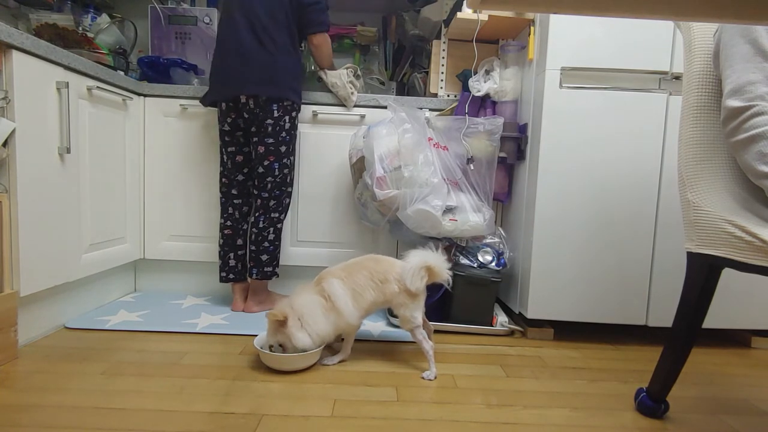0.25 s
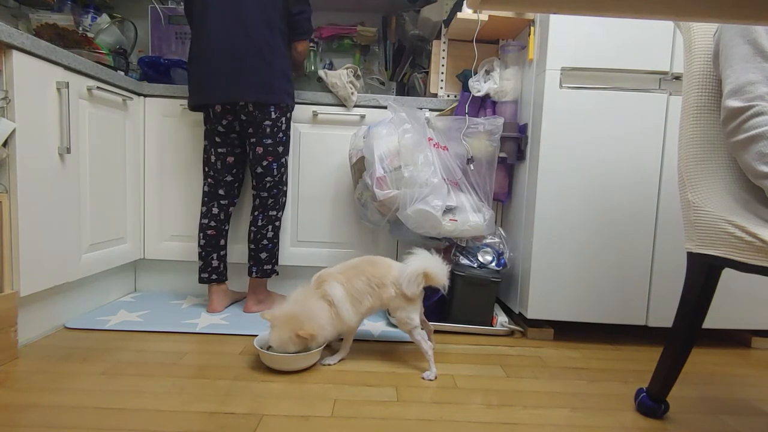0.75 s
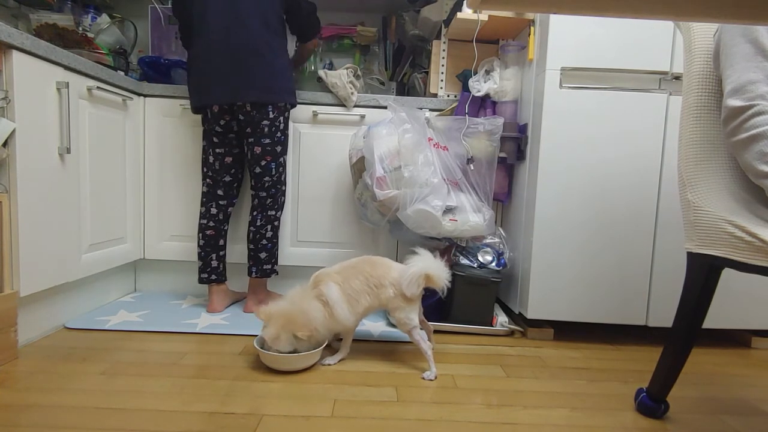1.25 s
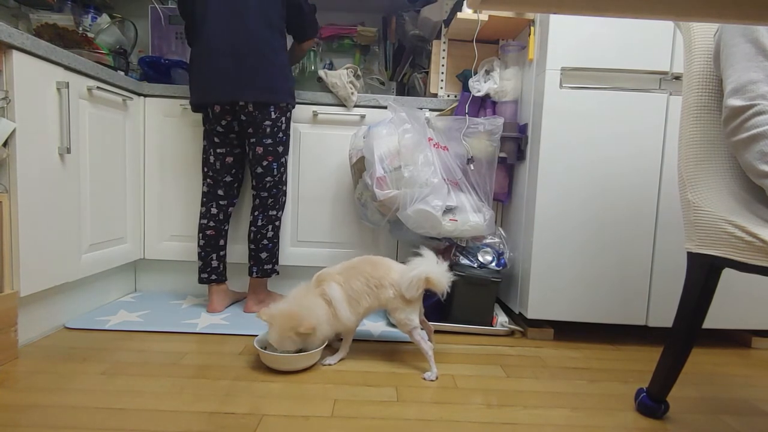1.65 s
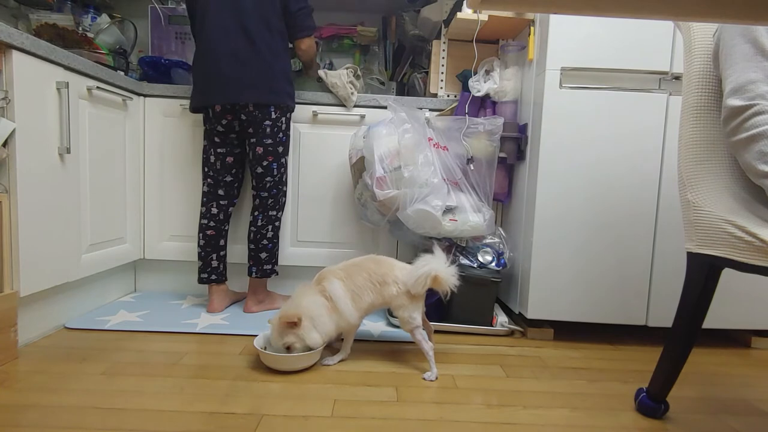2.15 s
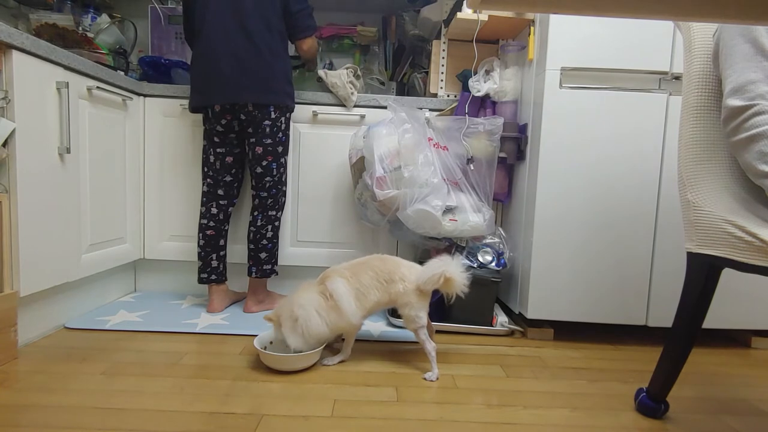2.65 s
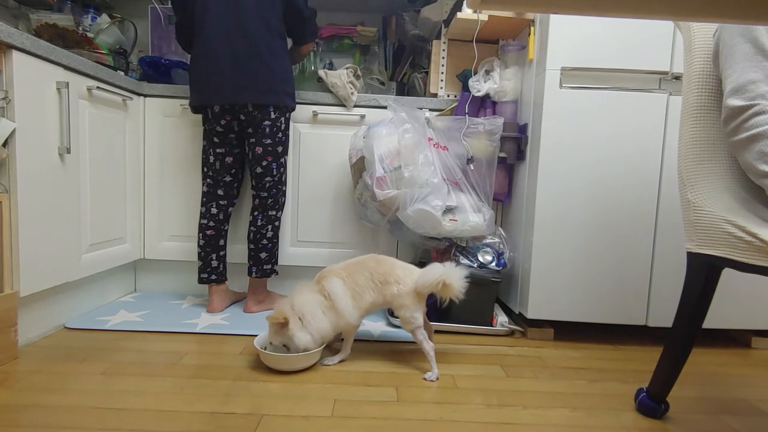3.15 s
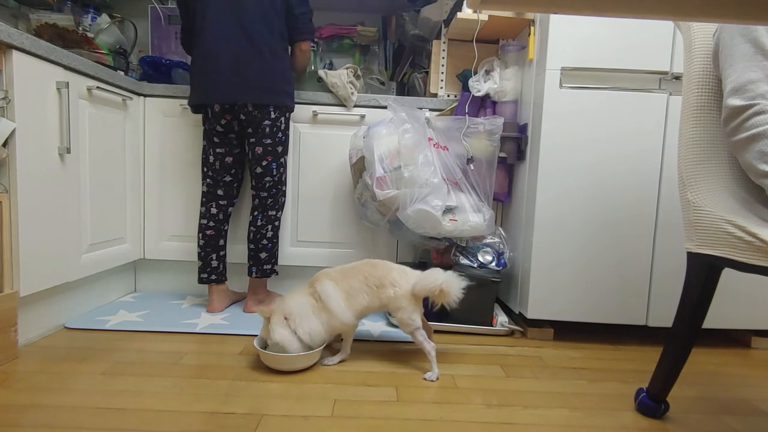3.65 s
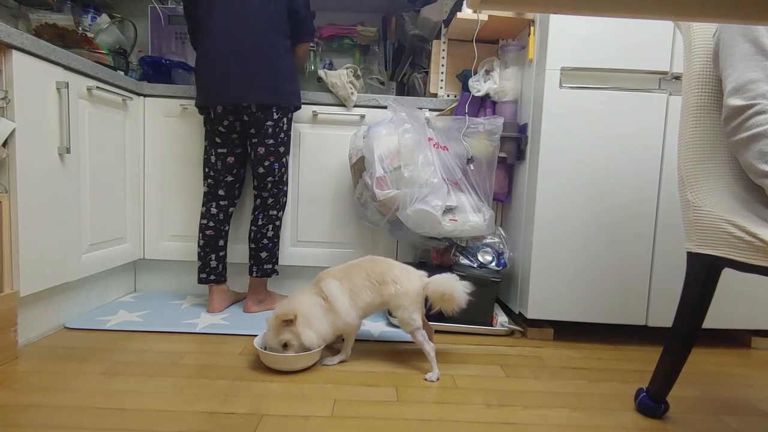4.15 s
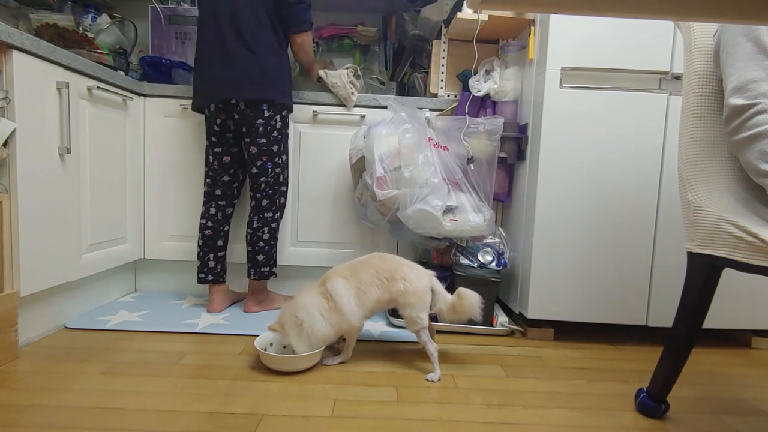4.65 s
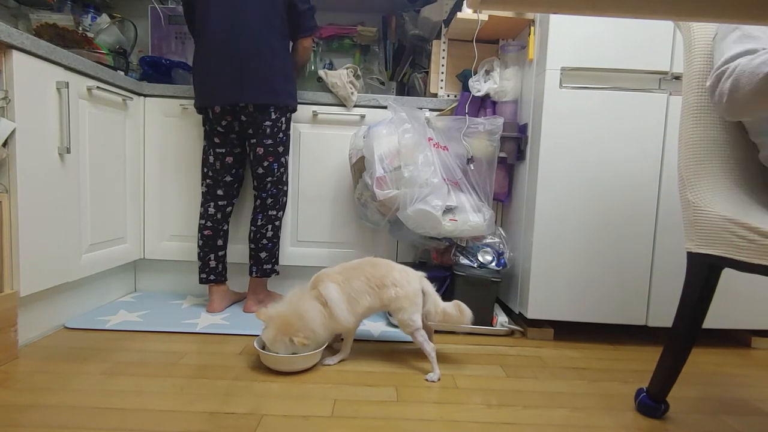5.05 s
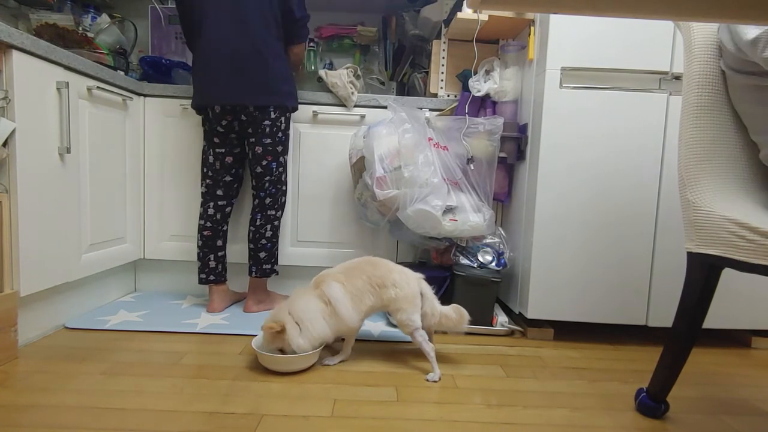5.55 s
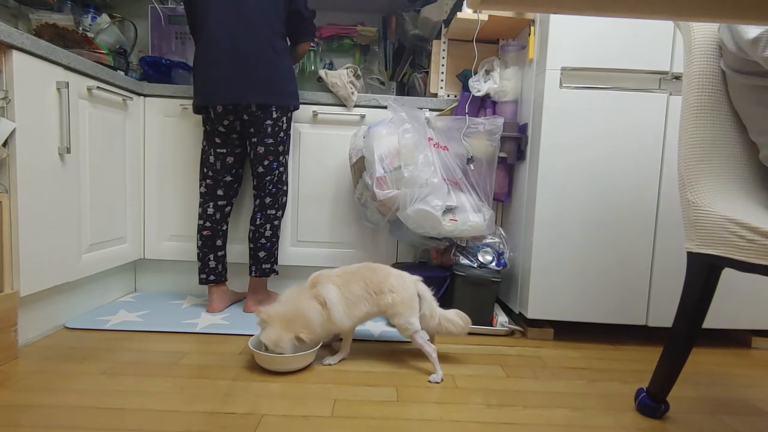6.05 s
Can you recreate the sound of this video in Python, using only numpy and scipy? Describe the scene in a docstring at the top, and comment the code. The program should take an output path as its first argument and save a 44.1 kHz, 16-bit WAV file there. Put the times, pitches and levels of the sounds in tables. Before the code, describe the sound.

A small dog eats dry kibble from a bowl a few steps away in a kitchen. Its muzzle stirs the pieces into a busy patter of little clinks and squeaks, mixed with gritty chewing. Sharper cracks stand out now and then, and the bowl is briefly knocked and nudged along the hard floor. After one short early pause the eating carries on, over a faint hiss and fridge hum.

```python
"""Squeaks, clinks and crunches: a small dog noses and chews dry kibble in a bowl a few steps away.
Pieces slip on the glaze and ring the bowl; teeth rasp and crack them; the bowl is shoved
across the hard kitchen floorboards. Behind it, a thin hiss rings in the same bands as the bowl
and a fridge hums faintly. Heard through a phone's two microphone ports and noise suppressor."""
import sys
import numpy as np
from scipy import signal
from scipy.fft import rfft, irfft
from scipy.io import wavfile
from scipy.ndimage import uniform_filter1d

SR = 44100
rng = np.random.default_rng(int(sys.argv[2]) if len(sys.argv) > 2 else 0)


def waveform_to_disk(signal):
    """Save audio, clipped to [-1, 1], as 16-bit WAV at the path in sys.argv[1]."""
    frames = np.transpose(np.atleast_2d(signal))
    scaled = np.clip(frames, -1, 1) * 32767
    samples = np.round(scaled).astype(np.int16)
    wavfile.write(sys.argv[1], SR, samples)


N = 278138
BAND_LIMIT_HZ = 16500
# bowl resonances: freq_hz, width_hz, level_db
BOWL_MODES = [(2144, 64, 2), (2860, 28, -8.5), (3044, 250, 6), (3920, 180, -9.5), (3853, 13, 4),
              (4836, 80, -8), (5030, 200, -18), (5500, 32, -41), (5596, 680, 12.5), (6000, 280, -54)]


def amp(db):
    return 10 ** (np.asarray(db) / 20)


def unit_rms(x):
    return x / np.sqrt(np.mean(x ** 2) + 1e-20)


def curve_at(points, hz):
    """Interpolate (freq_hz, value) points over log frequency."""
    f, value = np.transpose(points)
    return np.interp(np.log(hz + 1), np.log(f + 1), value)


def add(mix, start_s, sound):
    part = mix[max(round(start_s * SR), 0):][:len(sound)]
    part += sound[:len(part)]


def resonances(modes, hz):
    """Magnitude of (freq_hz, width_hz, level_db) peaks, summed in power."""
    return np.sqrt(sum(amp(db) ** 2 / (1 + (2 * (hz - f) / width) ** 2) for f, width, db in modes))


def filtered(x, gain_at_hz):
    return irfft(rfft(x) * gain_at_hz(np.fft.rfftfreq(len(x), 1 / SR)), len(x))


def crunch_noise(lo_hz, hi_hz, grit_db):
    """A dense hail of tiny, uneven fractures in one band, at unit rms."""
    # fracture spectrum: freq_hz, density_db
    spectrum = [(59, -52), (100, -66), (466, -21.5), (1910, -13.5), (2310, 1.5), (3320, 0), (3620, -4.5),
                (4780, 0), (7330, -3.5), (9270, -2), (10300, -7.5), (14800, -3), (16500, -49)]
    noise = rng.standard_normal(N)
    grain = amp(grit_db * uniform_filter1d(rng.standard_normal(N), size=30) * np.sqrt(30))
    passband = lambda hz: 1 / np.sqrt((1 + (lo_hz / (hz + 1)) ** 8) * (1 + (hz / hi_hz) ** 8))
    return unit_rms(filtered(noise * grain, lambda hz: amp(curve_at(spectrum, hz)) * passband(hz)))


def ring(width_ms, hz, peak_db, glide_hz_per_ms, phase_turns):
    """A note that swells, slides and fades within 60 ms, peaking 20 ms in."""
    t = np.arange(-.02, .04, 1 / SR)
    half_width_s = np.where(t < 0, .8, 1.1) * (width_ms + 1.8) / 1000 / 2
    envelope = amp(peak_db) / np.cosh(0.84 * t / half_width_s) ** 2
    return envelope * np.sin(2 * np.pi * (hz * t + 500 * glide_hz_per_ms * t ** 2 + phase_turns))


def fridge():
    """Steady hum lines whose phases wander."""
    # hum lines: freq_hz, rms_db
    lines = [(479.1, -78.5), (1082, -89), (1620, -81.5), (1744, -85.5), (1954, -100), (2213, -85),
             (2277, -75), (2616, -69.5)]
    t = np.arange(N) / SR
    wander_rad = np.cumsum(rng.standard_normal((len(lines), N)), axis=1) * 0.0081
    return sum(np.sqrt(2) * amp(db) * np.sin(2 * np.pi * hz * t + phase)
               for (hz, db), phase in zip(lines, wander_rad))


def hiss():
    """Broad noise with narrow rings on top; body and treble levels drift separately."""
    # broad spectrum: freq_hz, density_db
    floor = [(30, -13.5), (60, -17.5), (110, -25.5), (170, -48), (260, -25), (400, -20.5), (470, -16.5),
             (1800, -10), (2600, -6), (3750, -6.5), (4240, -8), (4800, -3), (6600, -13.5), (14200, -17.5),
             (16500, -22.5)]
    # narrow peaks: freq_hz, width_hz, relative_db
    rings = [(2390, 19, -41), (2950, 2.7, -7), (2934, 88, -2), (3414, 15, -21.5), (3694, 27, 4),
             (4850, 24, 2), (5230, 120, -37), (5960, 230, -20), (7300, 77, -9), (9650, 300, -8),
             (10400, 67, -17), (10860, 28, -3.5)]
    # level drift: time_s, body_db, treble_db
    drift = [(0.0, -51, -66), (0.65, -57, -64.5), (0.93, -58, -67), (1.51, -57.5, -60.5),
             (1.79, -60.5, -63.5), (2.12, -57, -76), (2.3, -59.5, -72), (2.6, -56, -62.5),
             (2.82, -58.5, -72), (3.28, -58.5, -60.5), (3.83, -58, -63.5), (4.49, -58.5, -64.5),
             (4.86, -56.5, -65.5), (5.12, -61, -72), (5.33, -54, -63), (5.7, -59.5, -64.5),
             (6.11, -56.5, -68), (6.3, -56.5, -62)]
    spectrum = lambda hz: amp(curve_at(floor, hz)) * np.hypot(1, amp(12) * resonances(rings, hz))
    noise = filtered(rng.standard_normal(N), spectrum)
    treble = filtered(noise, lambda hz: hz > 6700)
    time_s, body_db, treble_db = np.transpose(drift)
    t = np.arange(N) / SR
    return (unit_rms(noise - treble) * amp(np.interp(t, time_s, body_db))
            + unit_rms(treble) * amp(np.interp(t, time_s, treble_db)))


def board_shake(eating):
    """The boards rumble faintly under loud blows."""
    running_rms = np.sqrt(abs(uniform_filter1d(eating ** 2, size=600)))
    return amp(-45.5) * running_rms * crunch_noise(44, 136, grit_db=5)


def bowl_shove_gain():
    """Envelope of the bowl scraping along the boards, zero between shoves."""
    # one curve per shove: time_s, level_db
    shoves = [
        [(1.685, -24), (1.75, -26), (1.795, -33.5), (1.812, -57)],
        [(3.62, -45), (3.644, -42), (3.68, -64)],
        [(3.84, -50), (3.962, -36), (4.08, -57)],
    ]
    gain = np.zeros(N)
    for shove in shoves:
        time_s, level_db = np.transpose(shove)
        t = np.arange(time_s[0], time_s[-1], 1 / SR)
        add(gain, time_s[0], amp(np.interp(t, time_s, level_db)))
    return gain


def tooth_rasps():
    """Kibble rubs on teeth: grainy treble puffs, each with four thin rings."""
    # rasps: start_s, peak_db, centre_hz
    rasps = [(0.223, -46, 7340), (0.3042, -42, 8600), (0.32, -53, 7140), (0.3674, -43.5, 9400),
             (0.613, -45, 13800), (0.7013, -40.5, 7100), (0.7625, -50, 10200), (0.802, -41, 11800),
             (0.854, -43, 7600), (1.59, -61, 14300), (1.6382, -49, 10200), (1.962, -42, 7850),
             (2.0009, -38.5, 8000), (2.1043, -46.5, 7100), (2.145, -46, 9600), (2.2118, -47, 10100),
             (2.2755, -42.5, 14100), (2.335, -50, 14600), (2.623, -47, 13900), (2.657, -45, 10600),
             (2.6873, -42, 9400), (2.7175, -46, 11600), (2.7294, -44, 7200), (2.8504, -41, 8650),
             (2.8883, -48, 14900), (2.9527, -43.5, 13700), (3.017, -44.5, 8000), (3.045, -41.5, 13200),
             (3.4096, -55, 10800), (3.443, -45, 6660), (3.4565, -38.5, 6240), (3.5433, -45, 7150),
             (3.5813, -54, 11200), (3.5987, -49, 9200), (3.7524, -42.5, 13700), (3.8212, -43.5, 8340),
             (4.116, -44, 10600), (4.2258, -32, 6540), (4.3924, -40, 9500), (4.418, -41, 7200),
             (4.636, -43.5, 13500), (4.7353, -43, 7900), (4.7926, -46, 14600), (4.812, -39.5, 13800),
             (4.8385, -37, 8600), (4.8803, -38.5, 7000), (4.9247, -47, 14600), (5.0265, -42, 11100),
             (5.114, -43.5, 14000), (5.1417, -40.5, 8200), (5.1816, -53, 10600), (5.1986, -41.5, 9800),
             (5.3745, -38.5, 10000), (5.467, -50, 7200), (5.5194, -46, 10100), (5.887, -43, 14200),
             (5.9714, -44, 7350), (6.0102, -43.5, 14500), (6.0935, -46.5, 8600), (6.133, -47, 12800),
             (6.1725, -43, 7520), (6.2123, -41, 11600)]
    out, t = np.zeros(N), np.arange(1600) / SR
    swell = (t / .005) * np.exp(1 - t / .005)
    for (start_s, peak_db, centre_hz), draws in zip(rasps, rng.random((len(rasps), 4, 3))):
        peaks = [(centre_hz, 900, 0), (centre_hz, 7000, -9)]
        puff = filtered(rng.standard_normal(len(t)), lambda hz: (hz > 5000) * resonances(peaks, hz))
        grain = amp(25 * uniform_filter1d(rng.standard_normal(len(t)), size=50))
        rasp = puff * grain * swell
        add(out, start_s - .001, amp(peak_db) * rasp / abs(rasp).max())
        for lag, length, pitch in draws:
            note = ring(3 + 6 * length, 6500 + 8000 * pitch, peak_db - 19.5, 40 * (length - lag), lag)
            add(out, start_s - .015 + 0.0061 * lag, note)
    return out


def cracks_and_shoves():
    """Each crack is a three-band burst, a hollow knock and a note; shoves feed the upper two bands."""
    # bites and knocks: start_s, body_db, knock_db, knock_hz, treble_db, ring_hz, decay_ms
    cracks = [(0.2314, -62, -36.5, 1410, -66, 2430, 15), (0.242, -61, -39, 1080, -61, 2420, 30),
              (0.5397, -21.5, -52, 473, -19.5, 3076, 49), (0.7426, -24, -77, 1560, -27.5, 3280, 12),
              (0.9394, -54, -82, 476, -49, 3740, 31), (0.9934, -64, -86, 479, -45, 2680, 21),
              (1.6851, -20.5, -35.5, 1890, -29, 2257, 92), (1.7057, -22, -35.5, 1800, -33, 3370, 87),
              (1.7234, -20, -44, 1800, -29, 2254, 87), (1.7404, -21.5, -55, 1860, -40, 2348, 82),
              (1.7543, -24, -46, 461.6, -26.5, 2820, 230), (1.7794, -29.5, -47.5, 438, -28, 2925, 103),
              (1.918, -47, -52.5, 774, -52.5, 2860, 51), (2.47, -47, -89, 468, -40.5, 14800, 44),
              (2.452, -71, -76, 464, -50, 4900, 98), (3.436, -49, -49.5, 463, -66, 3830, 29),
              (3.5533, -36.5, -43.5, 473, -45, 2420, 28), (3.629, -37.5, -54, 1320, -42, 3260, 49),
              (3.6391, -30, -47.5, 462, -27, 9200, 63), (3.8508, -59, -55, 1055, -37.5, 14400, 70),
              (3.887, -67, -56, 1080, -39.5, 4610, 120), (3.906, -57, -50, 446, -33, 5440, 37),
              (3.923, -41, -46, 1160, -32, 12800, 47), (3.9439, -20.5, -24, 1733, -23, 2428, 48),
              (3.9741, -44, -44, 1444, -43, 4860, 75), (4.0208, -48, -47.5, 1370, -41, 4950, 50),
              (4.058, -38, -58, 1700, -44.5, 4820, 47), (4.3536, -53, -54.5, 913, -47.5, 2890, 36),
              (4.5365, -29, -44, 1813, -30, 4830, 57.5), (4.621, -64, -57, 446, -67, 3200, 97),
              (4.704, -33.5, -40, 1387, -36.5, 7990, 83), (5.064, -69, -56.5, 1790, -71, 3000, 56),
              (5.2336, -26.5, -46, 1660, -26.5, 3270, 16), (5.249, -27, -41.5, 1680, -17, 8430, 23.5),
              (5.2566, -25.5, -44, 1644, -23, 9400, 44), (5.3106, -63, -63, 1050, -51.5, 9150, 130),
              (5.3328, -48, -54.5, 1063, -39, 2460, 140), (5.438, -67, -48, 1706, -44, 4820, 91),
              (5.4834, -28.5, -84.5, 1800, -33, 2890, 25), (6.2283, -40.5, -50.5, 1658, -40.5, 5050, 126)]
    thud, body, treble, tones = np.zeros((4, N))
    t = np.arange(0, .15, 1 / SR)
    attack = lambda rise_s: 1 - np.exp(-t / rise_s)
    for start_s, body_db, knock_db, knock_hz, treble_db, ring_hz, decay_ms in cracks:
        fall_db = -60 * t / (decay_ms / 1000) - 60 * (t / 0.085) ** 3
        knock = amp(knock_db + 0.59 * fall_db) * attack(0.00066)
        add(thud, start_s, amp(-3.5) * knock)
        add(tones, start_s, knock * np.sin(2 * np.pi * knock_hz * t))
        add(body, start_s, amp(body_db + fall_db) * attack(0.0019))
        add(treble, start_s, amp(treble_db + 1.16 * fall_db) * attack(0.0012))
        ring_db = body_db + 4.5 if ring_hz < 6500 else treble_db + 6.5
        ring_gain = amp(ring_db + 1.47 * fall_db) * attack(0.0018)
        add(tones, start_s, ring_gain * np.sin(2 * np.pi * ring_hz * t))
    shove = bowl_shove_gain()
    return (tones + thud * crunch_noise(297, 1630, grit_db=4)
            + (body + amp(-7) * shove) * crunch_noise(2050, 6600, grit_db=2.2)
            + (treble + amp(-6.5) * shove) * crunch_noise(7670, 16000, grit_db=0.5))


def squeak(width_ms, pitch_hz, level_db, glide_hz_per_ms_per_khz, draws, skip_hz=0):
    """A piece slips on the glaze: all multiples of the slip rate slide together."""
    # overtone envelope: freq_hz, level_db
    spectrum = [(1300, -25), (2100, -14), (2900, 1), (3800, -2.5), (4850, -5.5), (5700, -5.5), (7200, -20),
                (9500, -19.5), (13000, -22), (16000, -31)]
    spread_db = 13
    harmonics_hz = pitch_hz * np.arange(1, len(draws) + 1)
    return sum(ring(width_ms, hz, level_db + curve_at(spectrum, hz) - spread_db * cut,
                    glide_hz_per_ms_per_khz * hz / 1000, phase)
               for hz, (cut, phase) in zip(harmonics_hz, draws)
               if hz < BAND_LIMIT_HZ and abs(hz - skip_hz) > 1)


def kibble_chatter(rate_per_s=100, width_ms=5.7, spread_db=14):
    """Jostled pieces: small squeaks at random times, at unit rms."""
    out = np.zeros(N)
    count = round(rate_per_s * N / SR)
    for draws, (when, cut, pitch, slide) in zip(rng.random((count, 14, 2)), rng.random((count, 4))):
        slip = squeak(width_ms, 920 + 900 * pitch ** 2, -spread_db * cut, 6.5 * (2 * slide - 1.3), draws)
        add(out, when * N / SR, slip)
    return unit_rms(out)


def muzzle_stir_gain(ramp_s=0.0053):
    """Envelope of the rattle as the muzzle stirs each mouthful."""
    # stirs: start_s, end_s, level_db
    stirs = [(0.247, 0.545, -76), (0.623, 0.92, -55.5), (1.6, 1.676, -52), (1.827, 1.888, -50),
             (1.936, 2.064, -48.5), (2.1, 2.35, -56.5), (2.625, 2.753, -52.5), (2.826, 3.119, -57),
             (3.325, 3.61, -60), (3.733, 3.914, -57), (3.97, 4.15, -57.5), (4.182, 4.43, -56.5),
             (4.614, 4.97, -54), (5.022, 5.234, -55), (5.323, 5.58, -51), (5.62, 5.776, -55.5),
             (5.843, 6.314, -55)]
    t = np.arange(N) / SR
    return sum(amp(level_db) * np.clip(np.minimum(t - start_s, end_s - t) / ramp_s, 0, 1)
               for start_s, end_s, level_db in stirs)


def bowl_chord(width_ms, level_db, draws):
    """All bowl modes at once; where the piece lands sets their strengths and detunes them a little."""
    return sum(ring(width_ms * (0.19 + length), hz + 0.97 * width_hz * (2 * detune - 1),
                    level_db + .5 * mode_db - 22 * cut, 30 * (detune - length) - 6, length)
               for (hz, width_hz, mode_db), (length, detune, cut) in zip(BOWL_MODES, draws))


def kibble_on_bowl():
    """Clinks of one loud ring, bowl modes, overtones, scratch and tick, over the stirred rattle."""
    # loudest squeaks: centre_s, width_ms, ring_hz, peak_db, glide_hz_per_ms, pitch_hz
    squeaks = [(0.2714, 5.9, 4784, -33.5, -13, 1200), (0.295, 3.9, 2750, -47, -22, 1380),
               (0.3072, 4.4, 3110, -37, 7, 780), (0.318, 6.9, 2940, -37, 12, 1480),
               (0.3323, 7.1, 2770, -43, 7, 1380), (0.343, 5.3, 2870, -38.5, -17, 1430),
               (0.3505, 6.4, 2880, -38.5, 4, 1450), (0.37, 6.8, 4640, -42, -21, 1160),
               (0.3891, 3.7, 4880, -40.0, -22, 970), (0.3973, 3.8, 4680, -43, -24, 1160),
               (0.43, 5, 3230, -45.5, -32, 1080), (0.4565, 5.2, 2945, -36.0, 2, 1460),
               (0.475, 5.0, 2980, -46.5, 23, 990), (0.4874, 4.7, 4590, -39, 0, 780),
               (0.5047, 4.8, 2810, -43, -27, 940), (0.5225, 5.6, 2890, -39, 16, 1450),
               (0.6188, 4.9, 2830, -43, -17, 1400), (0.6382, 3.8, 2830, -40.5, -29, 960),
               (0.659, 4.2, 3940, -38, 7, 990), (0.688, 2.6, 3250, -44, -10, 1110),
               (0.715, 6.1, 2830, -39.5, 14, 1420), (0.7638, 2.6, 4830, -35.5, -25, 1610),
               (0.7834, 9.5, 2927, -34.5, -4.5, 1460), (0.8074, 4.0, 5640, -39, -14, 1110),
               (0.839, 4.9, 4820, -40.0, -21, 960), (0.848, 7.1, 3680, -41, 3, 920),
               (0.8568, 3.7, 3750, -46, -29, 1880), (1.1227, 2.6, 3320, -46.5, -24, 650),
               (1.5937, 4.6, 4890, -36.5, 5, 980), (1.616, 8, 3930, -40, 13, 1320),
               (1.6421, 4.6, 4850, -36, 9, 1210), (1.6777, 13, 2870, -37, -6, 1460),
               (1.825, 3.5, 2940, -42, 28, 980), (1.8358, 4.3, 4870, -40.5, 0, 970),
               (1.8455, 5.6, 4640, -42.0, -19, 930), (1.8567, 6.5, 2960, -44, 34, 980),
               (1.8742, 6.7, 4840, -45, 7, 970), (1.9413, 10, 3240, -45.5, 8, 1080),
               (1.9623, 3.6, 3260, -42, -32, 1090), (2.003, 5.4, 4800, -35.5, 20, 970),
               (2.016, 3.7, 3740, -39, -11, 1230), (2.0277, 5, 4070, -43.5, -14, 1350),
               (2.04, 13.1, 2830, -39.0, -7, 1420), (2.1105, 5.4, 2880, -37.5, -3, 1440),
               (2.1197, 2.8, 2950, -41.5, -24, 1460), (2.1482, 3.6, 5120, -37.5, -17, 1290),
               (2.174, 7.3, 2790, -42.5, -18, 1360), (2.196, 5.8, 2740, -42.5, -17, 1340),
               (2.217, 5.1, 4840, -34.5, -9, 1220), (2.2444, 5.4, 2950, -40, 2, 970),
               (2.26, 6.7, 2990, -39, 18, 1460), (2.2858, 5.2, 2850, -40.5, -21, 950),
               (2.298, 6.8, 5200, -40, -20, 1300), (2.3401, 3.4, 4930, -46, -11, 980),
               (2.6325, 7.5, 3970, -44.5, -19, 980), (2.65, 8.4, 3230, -49, -28, 1070),
               (2.6626, 4.2, 5160, -43.5, 27, 1030), (2.688, 3.6, 4830, -41.5, 22, 980),
               (2.7172, 5.6, 4800, -42, -25, 1210), (2.7312, 3.6, 4870, -42, 35, 1200),
               (2.8224, 8.4, 3225, -42, 3, 1080), (2.8373, 11.4, 2930, -38.5, 6.5, 1460),
               (2.88, 7, 2730, -45, 17, 1380), (2.897, 3.1, 3120, -42, 31, 1050),
               (2.904, 9.8, 3185, -40.5, 10, 1070), (2.9204, 5.3, 3120, -44.5, -14, 1020),
               (2.942, 5.1, 3210, -40.5, -5, 1070), (2.974, 5.0, 4820, -38.5, -39, 960),
               (2.9927, 4.4, 4860, -43, -15, 970), (3.0024, 4.1, 2920, -48, -9, 970),
               (3.047, 7, 4870, -43, 42, 970), (3.068, 9.5, 3170, -44.5, -23, 1070),
               (3.0904, 4.6, 3760, -42.5, 19, 1240), (3.1023, 7.8, 4820, -41.5, 5, 700),
               (3.3427, 4.1, 4820, -41.5, 34, 1600), (3.361, 8.3, 5910, -45, -8, 2000),
               (3.3745, 7.7, 3730, -44, -8, 1860), (3.39, 6.5, 2940, -49.5, 1, 1470),
               (3.4141, 3.3, 5530, -43, -19, 1850), (3.447, 7.0, 5070, -47, -39, 1730),
               (3.461, 6.6, 6870, -53, -32, 1170), (3.478, 9.6, 5570, -47, -40, 1120),
               (3.52, 5.6, 5650, -46, -33, 930), (3.545, 4.0, 5770, -43.0, -18, 970),
               (3.5563, 5.2, 2435, -40, -17, 1210), (3.567, 4.2, 4670, -41.5, 9, 1580),
               (3.5819, 5, 3950, -41, -10, 1980), (3.6012, 8.6, 3740, -42, -18, 1860),
               (3.6615, 13.7, 4800, -34, 6.5, 800), (3.746, 10.5, 3810, -39, 13, 1900),
               (3.7651, 5.0, 3960, -39.5, -16, 1980), (3.7862, 7, 4590, -43.5, 29, 930),
               (3.801, 5.7, 3730, -36.5, -14, 1860), (3.8121, 6.6, 3680, -43.5, 2, 1850),
               (3.8253, 6.1, 3640, -41.5, -28, 1210), (3.8432, 3.6, 2320, -40.5, 4, 760),
               (3.8544, 2.8, 2530, -41, 24, 840), (3.8864, 10, 4570, -40, 6, 1150),
               (3.9794, 10, 4840, -32, 12, 810), (3.9956, 4.8, 4890, -37, -1, 1620),
               (4.0099, 6.5, 3730, -43, -22, 940), (4.0235, 6.8, 4950, -33, -2, 1640),
               (4.0592, 7.7, 4850, -44, -13, 1220), (4.076, 4.5, 4820, -43, -19, 1620),
               (4.1275, 6.4, 4780, -45, -28, 1200), (4.2219, 6, 4830, -39.5, 17, 1610),
               (4.2465, 2.8, 3200, -37.5, 6, 1070), (4.2755, 7.2, 3750, -43, 1, 1240),
               (4.2849, 6.1, 3710, -39.5, -15, 930), (4.327, 15, 2940, -45, 6, 1480),
               (4.352, 9.5, 5160, -42.5, -6, 1300), (4.4233, 11, 5900, -44.5, -42, 1490),
               (4.6467, 13, 3160, -41, -19, 1070), (4.6554, 3.0, 2960, -45.0, -22, 990),
               (4.666, 7.8, 2870, -46.5, -6, 970), (4.7115, 8.7, 2330, -36, 8, 780),
               (4.719, 18, 12800, -47, 5, 1600), (4.7236, 5, 2845, -44, -3, 720),
               (4.729, 17, 7900, -38.5, -7.5, 990), (4.7474, 8.3, 2860, -34, 3, 720),
               (4.7571, 4.3, 2740, -45, -19, 930), (4.766, 6.6, 2710, -44.0, -41, 1340),
               (4.7773, 4, 2650, -46.5, 6, 1320), (4.7967, 2.7, 4800, -38.5, -32, 1180),
               (4.8047, 5.6, 3690, -35, 2, 1230), (4.8308, 5.4, 3580, -46, -24, 1200),
               (4.85, 4.4, 5770, -43.5, -48, 1140), (4.8834, 3.2, 5030, -41, -11, 1010),
               (4.8904, 4.8, 4970, -38.5, -25, 990), (4.9087, 5.1, 4880, -41.5, -22, 980),
               (4.9296, 5.8, 4880, -42.5, 14, 970), (4.9394, 3.8, 3070, -41.5, 22, 990),
               (5.0305, 6, 5200, -40, -25, 1040), (5.082, 6.3, 2950, -38.5, -15, 970),
               (5.1391, 3.2, 4960, -40, 4, 1220), (5.149, 8.8, 2870, -43.0, 0, 1430),
               (5.1687, 3.5, 2880, -38, 6, 950), (5.184, 7.2, 3970, -40.5, 30, 1320),
               (5.206, 6.7, 3170, -44, -30, 1070), (5.228, 2.9, 3700, -46, -28, 1880),
               (5.2362, 7.8, 3190, -37, 29, 810), (5.3445, 4.1, 2470, -43.5, -32, 1240),
               (5.3846, 5.9, 4660, -41.5, -21, 930), (5.394, 6.8, 2870, -44.5, -2, 960),
               (5.417, 10, 3690, -40, -10, 920), (5.4407, 8.7, 4900, -39.0, -9, 1220),
               (5.4968, 4.9, 4810, -42, 40, 960), (5.5097, 4.3, 3690, -47.5, -22, 920),
               (5.5275, 5.1, 4820, -42, 19, 970), (5.5596, 10, 3160, -46.5, -18, 1600),
               (5.6226, 4.9, 4120, -46.0, 26, 2100), (5.6321, 9.0, 4140, -48, 9, 700),
               (5.6503, 9.0, 4300, -45, 21, 2150), (5.6751, 39, 4060, -52.5, -1.5, 820),
               (5.7281, 8.0, 4710, -54, -22, 1180), (5.7513, 13, 4250, -54, -4, 2120),
               (5.8505, 9.0, 3700, -50.5, -10, 1840), (5.8952, 2.8, 4880, -37, -7, 970),
               (5.9023, 5.1, 2970, -38, 3, 980), (5.9157, 3.5, 3140, -43.5, 26, 790),
               (5.927, 5.1, 2800, -40.5, 13, 700), (5.937, 3.1, 3150, -43.5, -33, 1610),
               (5.9713, 5, 3710, -36, -23, 1240), (5.9803, 3.3, 3730, -38, 26, 1220),
               (6.0038, 3.8, 3880, -41.5, 5, 990), (6.0195, 8.2, 3020, -41.0, -16, 970),
               (6.039, 5.6, 4820, -37, -18, 960), (6.094, 4.5, 4650, -42.5, 24, 780),
               (6.1168, 6.6, 2785, -42.5, 12, 1390), (6.1246, 4.8, 2760, -44, 2, 1380),
               (6.135, 4.1, 5560, -39.5, -9, 1380), (6.1662, 8, 3210, -40.5, -22, 1080),
               (6.192, 11, 2960, -44, -2, 980)]
    clinks, strike = np.zeros((2, N))
    t = np.arange(900) / SR
    all_mode_draws = rng.random((len(squeaks), len(BOWL_MODES), 3))
    all_slip_draws = rng.random((len(squeaks), 16, 2))
    for row, mode_draws, slip_draws in zip(squeaks, all_mode_draws, all_slip_draws):
        centre_s, width_ms, ring_hz, peak_db, glide_hz_per_ms, pitch_hz = row
        note = ring(width_ms, ring_hz, peak_db, glide_hz_per_ms, mode_draws[0, 0])
        chord = bowl_chord(min(width_ms, 3.1), peak_db - 10.5, mode_draws)
        slip_hz = ring_hz / round(ring_hz / pitch_hz)  # puts the ring on a harmonic
        overtones = squeak(width_ms, slip_hz, peak_db - 4, glide_hz_per_ms * 1000 / ring_hz,
                           slip_draws, skip_hz=ring_hz)
        add(clinks, centre_s - .02, note + chord + overtones)
        add(strike, centre_s - .003, amp(peak_db) * (t / 0.0054) * np.exp(1 - t / 0.0013))
    chatter = kibble_chatter()
    scratch = crunch_noise(1500, 9000, grit_db=3)
    tick = crunch_noise(7000, 16000, grit_db=4)
    rattle = muzzle_stir_gain() * (chatter + amp(-20) * scratch)
    return clinks + strike * (amp(-10.5) * scratch + amp(-7.5) * tick) + rattle


def kitchen(x, t60_s=0.056, tail_db=-9.5):
    """Add a short faint tail from cupboards and floor."""
    tail = rng.standard_normal(6000) * amp(-60 * np.arange(6000) / SR / t60_s)
    return x + amp(tail_db) * signal.oaconvolve(x, tail / np.linalg.norm(tail))[:N]


def microphone_ports(x, scatter_t60_s=.035, head_sway_hz=3):
    """Two ports share the bass; near surfaces scatter the treble, shifting as the head moves."""
    # left-right likeness: freq_hz, correlation
    likeness = [(60, .96), (600, .97), (1400, .85), (3000, .75), (6800, .3), (15000, -.15)]
    # balance: freq_hz, left_minus_right_db
    balance = [(60, -1.5), (600, -0.1), (1400, 0), (4000, -2), (8000, -3.5), (15000, -2.5)]
    taps = rng.standard_normal((2, 1600)) * amp(-60 * np.arange(1600) / SR / scatter_t60_s)
    taps /= np.linalg.norm(taps[0])
    sway_rad = 2 * np.pi * head_sway_hz * np.arange(N) / SR
    scattered = signal.oaconvolve(x * [np.cos(sway_rad), np.sin(sway_rad)], taps, axes=1)[:, :N].sum(0)
    hz = np.fft.rfftfreq(N, 1 / SR)
    spread_rad = np.arccos(np.clip(curve_at(likeness, hz), -1, 1)) / 2
    mid, side = rfft(x) * np.cos(spread_rad), rfft(scattered) * np.sin(spread_rad)
    tilt = amp(curve_at(balance, hz) / 2)
    return irfft(np.array([(mid + side) * tilt, (mid - side) / tilt]), N)


def suppress_noise(x, memory_s=0.46, floor_db=-4):
    """Turn down bins far under their recent mean, so tails and gaps darken."""
    bins = signal.stft(x, nperseg=256, noverlap=192)[2]
    power = uniform_filter1d((abs(bins) ** 2).mean(0), size=9, axis=0)
    power = uniform_filter1d(power, size=5, axis=1)
    capped = np.minimum(power, amp(5.5) * power.mean(1, keepdims=True))
    pole = np.exp(-64 / SR / memory_s)
    recent = signal.lfilter([1 - pole], [1, -pole], capped, axis=1)
    gain = np.clip(1 - 0.1 * recent / (power + 1e-20), amp(floor_db), 1)
    return signal.istft(bins * gain, nperseg=256, noverlap=192)[1][:, :N]


def scene():
    """The eating dog in the kitchen over hiss and hum, in stereo."""
    highpass = signal.butter(6, 390, "high", fs=SR, output="sos")
    eating = signal.sosfilt(highpass, kibble_on_bowl() + tooth_rasps() + cracks_and_shoves())
    return microphone_ports(kitchen(eating) + board_shake(eating) + hiss() + fridge())


def record(dry):
    """Noise suppressor, soft limiter, band limit and the converter's steady bias."""
    ceiling, bias = .4, -.001
    limited = ceiling * np.tanh(suppress_noise(dry) / ceiling)
    lowpass = signal.firwin(511, BAND_LIMIT_HZ, window=("kaiser", 9), fs=SR)
    return signal.oaconvolve(limited, lowpass[None], "same") + bias


dry = scene()
out = record(dry)
waveform_to_disk(out)
```